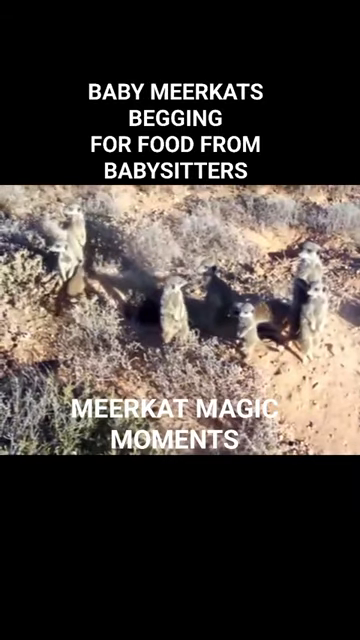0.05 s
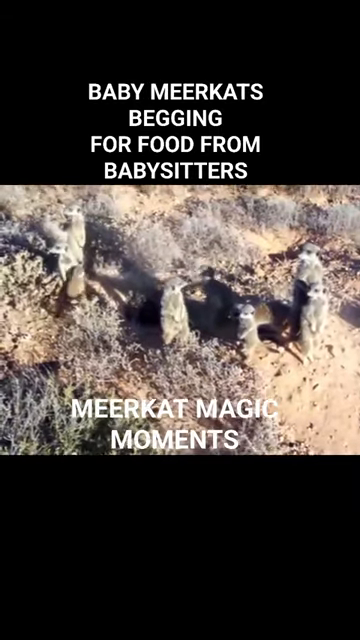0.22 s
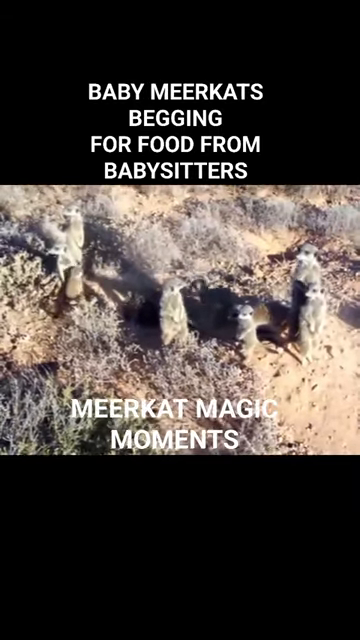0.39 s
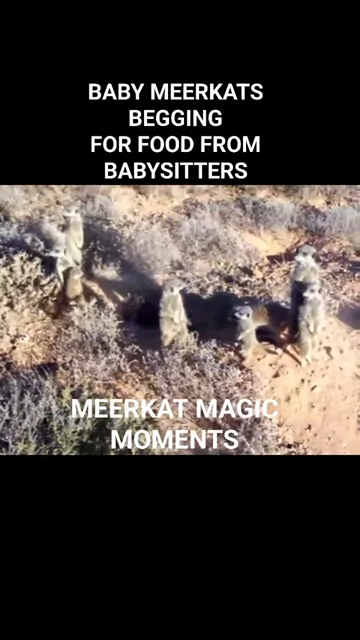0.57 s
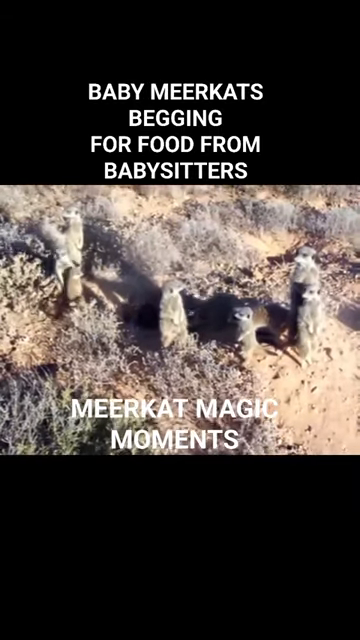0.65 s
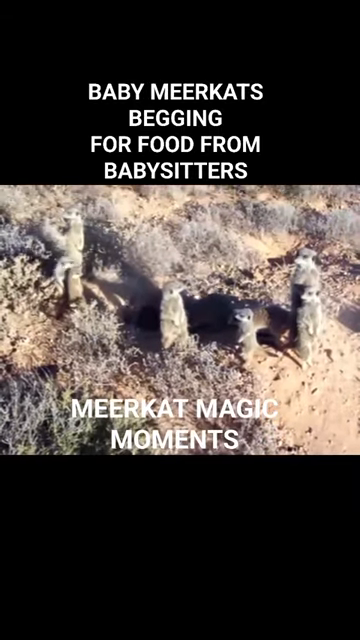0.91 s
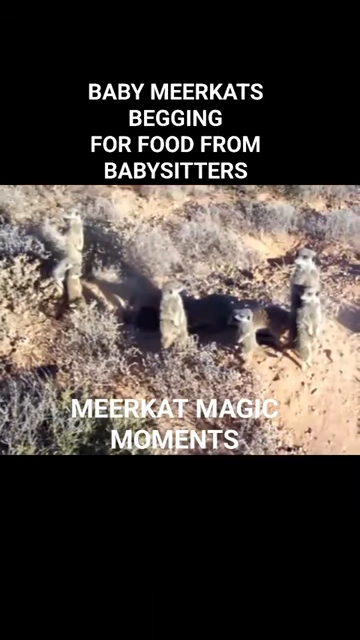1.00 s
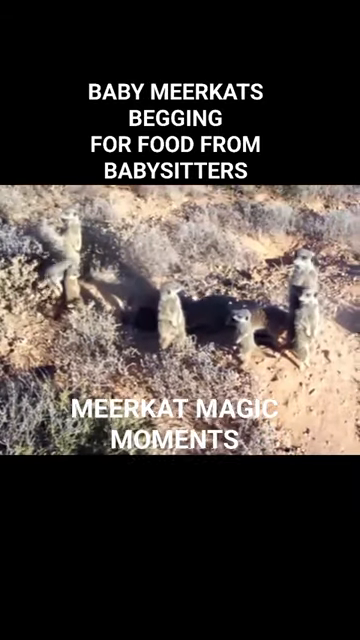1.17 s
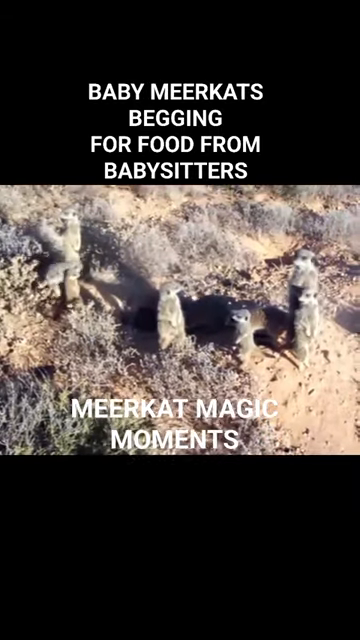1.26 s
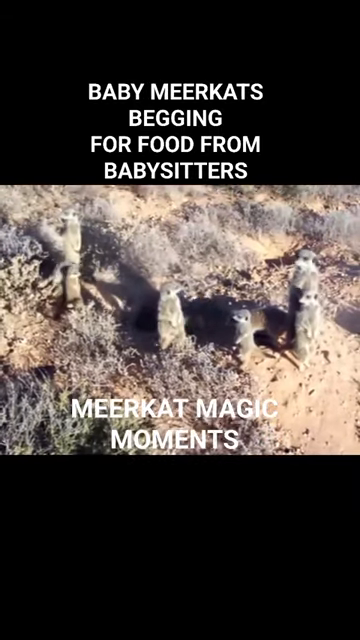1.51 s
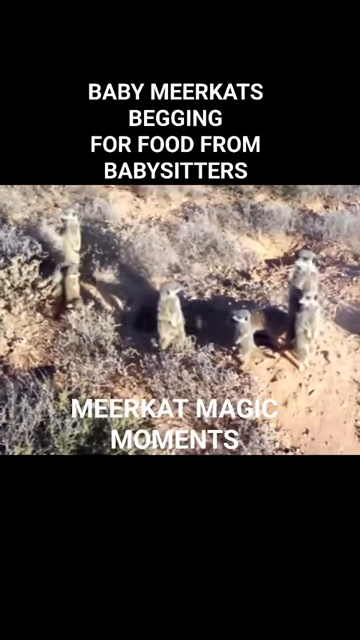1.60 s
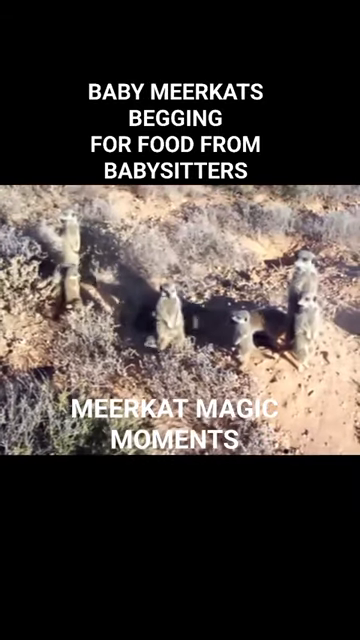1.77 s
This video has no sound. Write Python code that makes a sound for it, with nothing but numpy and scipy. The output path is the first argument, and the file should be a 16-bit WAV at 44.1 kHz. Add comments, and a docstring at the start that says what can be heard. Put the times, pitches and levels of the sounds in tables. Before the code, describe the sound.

A meerkat pup begs with one harsh, drawn-out, trilling call, just after a sharp click close to the microphone. Other meerkats chirp and coo briefly around it, followed by faint ticks and soft thumps over quiet open-air hiss.

```python
"""A meerkat pup begging

A pup gives one long, harsh call whose pitch trills about seventy times a second, while other meerkats
chirp around it. Each voice is a source and a filter: unsteady vocal folds make harmonics, and the
throat's resonances weight them. Soft coos, a sharp click, dry ticks and dull thumps sound over
a low hum, a quiet open-air hiss and a fine, dry rustle."""
import sys
import numpy as np
from scipy import signal
from scipy.fft import rfft, irfft, next_fast_len
from scipy.io import wavfile
from scipy.ndimage import uniform_filter1d

SR = 44100
rng = np.random.default_rng(int(sys.argv[2]) if len(sys.argv) > 2 else 0)


def file_out(sig):
    """Save sig as 16-bit WAV at sys.argv[1]."""
    # one column per channel
    cols = np.atleast_2d(sig).T
    # limit, then scale
    lim = np.clip(cols, -1, 1)
    pcm = np.round(lim * 32767).astype(np.int16)
    wavfile.write(sys.argv[1], SR, pcm)


N = 81585
TIME = np.arange(N) / SR

# spectrum of the open-air hiss: frequency_hz, gain_db
AIR_SPECTRUM = [(15, -23), (25, -17), (45, -1.5), (102, -4.5), (173, -7), (279, -8), (355, -10),
                (532, -8.5), (726, -13.5), (1140, -18), (1300, -15), (1520, -17.5), (2180, -21),
                (3190, -22), (4900, -23.5), (7500, -56.5), (8200, -36), (10000, -49), (10800, -63.5),
                (15000, -68)]
# swells of the rustle: time_s, level_db
RUSTLE_SWELLS = [(0, -65), (.4, -67), (.5, -52.5), (.57, -60), (.64, -64), (.72, -57.5), (.785, -51.5),
                 (.85, -58.5), (1.2, -64), (1.32, -60), (1.37, -64.5), (1.6, -63.5), (1.85, -66.5)]
# spectrum of the rustle: frequency_hz, gain_db
RUSTLE_SPECTRUM = [(3000, -38), (4400, 1), (5500, 6.5), (6600, 5), (7600, 1.5), (8300, -14), (11000, -49)]
# coos: start_s, length_s, first_pitch_hz, middle_pitch_hz, last_pitch_hz, level_db
COO_NOTES = [(.0, .1, 1354, 1280, 1244, -57), (.04, 0.065, 277, 244, 257, -53.5),
             (0.667, .045, 290, 252, 235, -53), (.723, 0.043, 870, 766, 843, -41.5),
             (0.845, 0.067, 277, 218, 227.3, -47)]
# chirps: start_s, length_s, top_pitch_hz, top_place_fraction, level_db, tilt_db_per_octave, roughness
CHIRP_NOTES = [(0.199, 0.035, 1100, 0.75, -41, -2, 0.22), (0.333, 0.035, 990, .55, -40.5, -3.5, 0.14),
               (0.46, 0.041, 920, 0.72, -44.5, -6.5, 0.58), (.647, 0.041, 990, 0.44, -41, -9, 0.63),
               (0.671, 0.027, 950, 0.83, -43, -12, 0.37), (0.865, 0.039, 990, 0.51, -46.5, -12, 0.57),
               (1.216, .032, 788, 0.41, -48, -9, 0.49), (1.409, 0.0325, 850, 0.65, -52.5, -13.5, 0.34),
               (1.438, 0.037, 960, 0.68, -42, 3, .32), (1.541, 0.039, 900, 0.71, -51, -13.5, 0.55)]
# resonances of the chirping throat: frequency_hz, gain_db
CHIRP_FORMANTS = [(750, -7), (1000, -13), (1400, -3.5), (1750, 6.5), (2100, -4), (2500, -10.5), (2900, -1),
                  (3700, -14.5), (4400, -4), (5000, -16.5), (6000, -18), (8000, -47), (9500, -38),
                  (11000, -68)]
# spectrum of the click's tail: frequency_hz, gain_db
CLICK_TAIL_SPECTRUM = [(100, -1.5), (600, 1.5), (1200, -2), (2200, 0.5), (3500, -2), (6000, -5),
                       (9800, -16.5), (10800, -34), (15000, -56)]
# course of the begging call: time_s, pitch_hz, trill_depth_fraction, level_db, roughness
BEGGING_CALL = [(.41, 520, 0.082, -45.5, 0.74), (.435, 530, 0.096, -44, 0.72), (.452, 650, 0.13, -44, 0.62),
                (0.521, 685, .16, -44.5, 0.6), (0.579, 680.2, 0.203, -41.5, 0.53),
                (0.659, 680.4, .17, -41.5, 0.48), (.70, 681.5, 0.16, -42.5, 0.56),
                (0.769, 699.5, 0.19, -40, 0.36), (.85, 678.7, 0.175, -40, 0.29),
                (0.917, 747, 0.15, -38.5, 0.24), (1.0, 682, 0.18, -39, 0.27),
                (1.09, 669.3, .14, -39.5, 0.3), (1.145, 685.6, 0.099, -37.5, 0.29),
                (1.176, 644, 0.044, -39, 0.24), (1.2, 651, 0.016, -40, 0.3),
                (1.22, 616, 0.032, -40.5, 0.17), (1.238, 510, 0.085, -48.5, 0.93)]
# speed of its trill: time_s, rate_hz
TRILL_RATE = [(.412, 63.2), (.68, 63.2), (.70, 73.5), (.83, 73.5), (.85, 66.7), (.99, 66.7), (1.0, 63.2)]
# steady resonances of the pup's throat: frequency_hz, gain_db
PUP_FORMANTS = [(450, -10), (700, -11), (1050, -15), (1400, 2), (1700, 6), (2050, -1), (2400, -8.5),
                (2850, -6), (3400, -16), (4000, -9), (4750, -7), (5150, -19), (5500, -12.5), (6100, -27.5),
                (7200, -22), (8100, -34.5), (9400, -28), (10500, -70)]
# its bright upper resonance: time_s, centre_hz, boost_db
UPPER_FORMANT = [(.41, 3380, 17), (.45, 4370, 5), (.5, 4600, 6), (.57, 4640, 11.5), (.67, 4780, 15),
                 (.695, 4600, 10), (.745, 4570, 14.5), (.84, 4450, 14), (.95, 4450, 15.5),
                 (1.0, 4336, 14.5), (1.08, 4260, 13), (1.13, 4261, 16), (1.19, 4254, 14.5), (1.24, 4120, 8)]
# its middle resonance, strongest midway through the call: time_s, boost_db
MIDDLE_FORMANT = [(.45, -0.5), (.56, -4.5), (.64, -2.5), (.73, 7), (1.12, 1.5), (1.22, -4)]
# dry ticks: start_s, burst_level_db, centre_hz, t60_s
TICK_BURSTS = [(1.0655, -27.5, 4520, .007), (1.3018, -43.5, 4800, 0.026), (1.3975, -36.5, 4570, 0.0052),
               (1.6237, -51, 5300, 0.022), (1.798, -37, 4760, 0.012)]
# soft thumps: start_s, level_db, pitch_hz, t60_s
THUMP_KNOCKS = [(1.1073, -27.5, 520, 0.014), (1.278, -24, 700, 0.017), (1.8435, -36.5, 705, 0.013)]


def from_db(db):
    """Decibels to an amplitude ratio."""
    return 10 ** (np.asarray(db) / 20)


def unit_power(x):
    """Normalisation to a mean square of one."""
    return x / np.sqrt(np.mean(x ** 2) + 1e-20)


def in_time(rows):
    """Linear interpolation of a table's columns over time."""
    times, *columns = np.transpose(rows)
    return [np.interp(TIME, times, column) for column in columns]


def db_at(spectrum, hz):
    """Interpolation of a spectrum on a log-frequency axis."""
    frequencies, db = np.transpose(spectrum)
    return np.interp(np.log(np.maximum(hz, 1)), np.log(frequencies), db)


def bell(x, centre, width):
    """A Gaussian of height one."""
    return np.exp(-.5 * ((x - centre) / width) ** 2)


def noise(gain_at):
    """Spectral shaping: white noise weighted by gain_at(hz), at unit power."""
    size = next_fast_len(N, True)
    hz = np.arange(size // 2 + 1) * SR / size
    spectrum = rfft(rng.standard_normal(size)) * gain_at(hz)
    return unit_power(irfft(spectrum, size)[:N])


def drift(rate_hz, size=8192):
    """Low-pass noise: a smooth random fluctuation up to about rate_hz."""
    hz = np.arange(size // 2 + 1) * SR / N
    slow = irfft(rfft(rng.standard_normal(size)) * bell(hz, 0, rate_hz))
    return np.interp(TIME, np.linspace(0, N / SR, size), unit_power(slow))


def gate(start, end, attack_s, release_s):
    """An envelope with quarter-sine edges."""
    ramp = np.minimum((TIME - start) / attack_s, (end - TIME) / release_s)
    return np.sin(np.pi / 2 * np.clip(ramp, 0, 1))


def decay(start, t60):
    """Exponential decay from a sudden onset: 60 dB in t60 seconds."""
    return (TIME >= start) * np.exp(-np.log(1000) * np.maximum(TIME - start, 0) / t60)


def air_hiss():
    """Broadband noise of almost constant level, strongest in the bass."""
    level_db = -49.5 + 0.2 * drift(5.2)
    return from_db(level_db) * noise(lambda hz: from_db(db_at(AIR_SPECTRUM, hz)))


def hum():
    """Slow random modulation of frequency and amplitude makes a low sinusoid waver."""
    pitch_hz = 72.4 + 1.96 * drift(5.9)
    level_db = -53 + 3 * drift(6.8)
    return from_db(level_db) * np.sqrt(2) * np.sin(2 * np.pi * np.cumsum(pitch_hz) / SR)


def rustle():
    """Amplitude-modulated noise, as of dry scrub; partial decorrelation between the ears widens it."""
    level_db, = in_time(RUSTLE_SWELLS)
    mid, side = [noise(lambda hz: from_db(db_at(RUSTLE_SPECTRUM, hz))) for _ in range(2)]
    stereo = mid + from_db(-4.5) * side * np.array([[1], [-1]])
    grain_db = drift(130)
    return from_db(level_db + grain_db) * stereo


def coos():
    """Frequency glides: soft, pure tones that dip in pitch."""
    out = 0
    for start, length, first_hz, middle_hz, last_hz, db in COO_NOTES:
        pitch = np.interp((TIME - start) / length, [0, .5, 1], [first_hz, middle_hz, last_hz])
        tone = np.sqrt(2) * np.sin(2 * np.pi * np.cumsum(pitch) / SR)
        out += from_db(db) * gate(start, start + length, attack_s=0.017, release_s=0.017) * tone
    return out


def voice(pitch, roughness, throat_db, harmonics):
    """Source-filter model: the throat weights the harmonics of unsteady vocal folds. Near unit power."""
    jitter, wobble, shimmer = 0.0351, .035, 0.14   # relative deviations at a roughness of one
    jitter_hz, wobble_hz = 312, 50
    breathy_above_hz, breathy_share, rasp_db = 5900, .4, -3.5
    unsteady = 1 + roughness * (jitter * drift(jitter_hz) + wobble * drift(wobble_hz))
    phase = 2 * np.pi * np.cumsum(pitch * unsteady) / SR
    out, power = 0, 0
    for k in range(1, harmonics + 1):
        gain = from_db(throat_db(k * pitch))
        breath = breathy_share * np.clip((k * pitch - breathy_above_hz) / pitch, 0, 1)
        sine = np.sin(k * phase)
        # random sidebands smear each harmonic, the highest most
        rasp = drift(jitter_hz) * sine + drift(jitter_hz) * np.cos(k * phase)
        rasp_gain = np.hypot(from_db(rasp_db) * roughness, np.sqrt(breath / 2))
        out += gain * (np.sqrt(1 - breath) * sine + rasp_gain * rasp)
        power += gain ** 2 / 2
    flutter = 1 + shimmer * roughness * drift(jitter_hz)
    return out * flutter / np.sqrt(uniform_filter1d(power, size=700))


def chirps():
    """Formant filtering: each call is one arch of pitch, with a resonance near its second harmonic."""
    out = 0
    for start, length, top_hz, top_place, db, tilt, roughness in CHIRP_NOTES:
        from_top = np.interp((TIME - start) / length, [0, top_place, 1], [-1, 0, 1])
        pitch = top_hz * (1 - .24 * from_top ** 2)
        tone = voice(pitch, roughness,
                     lambda hz: db_at(CHIRP_FORMANTS, hz) + tilt * np.log2(hz / top_hz), harmonics=10)
        out += from_db(db) * gate(start, start + length, attack_s=0.004, release_s=0.0057) * tone
    return out


def click(start_s=.2217, centre_hz=4600, band_hz=4200, width_s=0.00074):
    """A brief impulse has a wide spectrum: one hard, bright crack close by, then a duller noise tail."""
    t = TIME - start_s
    crack = .92 * bell(t, 0, width_s) * np.sinc(band_hz * t) * np.cos(2 * np.pi * centre_hz * t)
    tail_envelope = decay(start_s, t60=0.018) * np.clip(t / width_s, 0, 1)
    tail = tail_envelope * noise(lambda hz: from_db(db_at(CLICK_TAIL_SPECTRUM, hz)))
    return crack + from_db(-20) * tail


def begging_pup():
    """Frequency modulation: the pitch trills in quick arches, steadies near the end and falls away."""
    pitch, depth, db, roughness = in_time(BEGGING_CALL)
    trill_hz, = in_time(TRILL_RATE)
    upper_hz, upper_db = in_time(UPPER_FORMANT)
    middle_db, = in_time(MIDDLE_FORMANT)
    cycle = np.cumsum(trill_hz * (TIME > TRILL_RATE[0][0])) / SR % 1
    arches = np.sin(np.pi * cycle ** 1.3) - 2 / np.pi   # each rises slowly and drops fast
    arches *= 1 + 0.285 * drift(50)   # uneven in depth

    def throat_db(hz):
        """Steady formants and two that vary add in decibels."""
        upper = upper_db * bell(hz, upper_hz, width=308)
        middle = middle_db * bell(hz, centre=2720, width=420)
        return db_at(PUP_FORMANTS, hz) + upper + middle

    start, end = BEGGING_CALL[0][0], BEGGING_CALL[-1][0] + 0.01
    envelope = from_db(db) * gate(start, end, attack_s=0.015, release_s=0.01)
    return envelope * voice(pitch * (1 + depth * arches), roughness, throat_db, harmonics=16)


def ticks(half_width_octaves=0.4):
    """Brief noise bursts excite a broad resonance: tiny crackles, as of dry twigs and grit."""
    out = 0
    edge_ratio = 2 ** half_width_octaves
    for start, db, centre, t60 in TICK_BURSTS:
        band = signal.butter(2, [centre / edge_ratio, centre * edge_ratio], "band", fs=SR, output="sos")
        burst = decay(start, t60) * noise(lambda hz: bell(hz, centre, centre / 2))
        out += from_db(db) * signal.sosfilt(band, burst + 1e-18)
    return out


def thumps(attack_s=0.00081, puff_hz=306.2):
    """Damped oscillation: dull knocks ring for a few cycles over a short, low puff of noise."""
    out = 0
    for start, db, pitch, t60 in THUMP_KNOCKS:
        t = TIME - start
        knock = decay(start, t60) * np.sin(2 * np.pi * pitch * t)
        puff = from_db(-13.5) * decay(start, t60=0.03) * noise(lambda hz: bell(hz, puff_hz, puff_hz))
        out += from_db(db) * np.clip(t / attack_s, 0, 1) * (knock + puff)
    return out


def scene():
    """Superposition: the sources add in the centre, and only the rustle is wide."""
    return air_hiss() + hum() + rustle() + coos() + chirps() + click() + begging_pup() + ticks() + thumps()


def record(dry):
    """Low-pass filtering cuts the top steeply: 70 dB down from 15.7 kHz upward."""
    return signal.sosfilt(signal.cheby2(12, 70, 15700, fs=SR, output="sos"), dry)


dry = scene()
out = record(dry)
file_out(out)
```